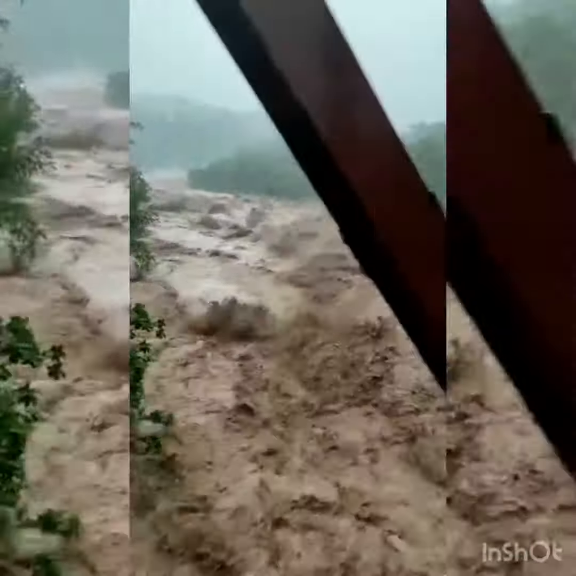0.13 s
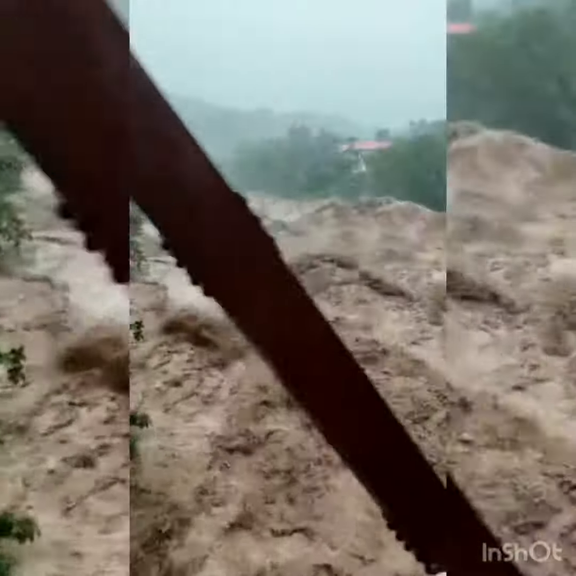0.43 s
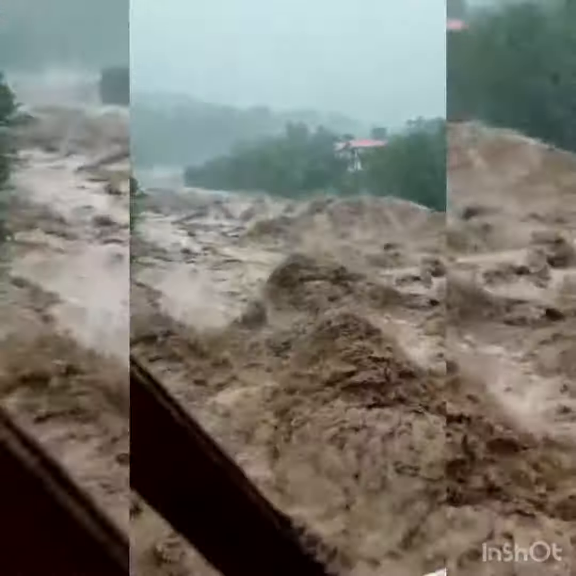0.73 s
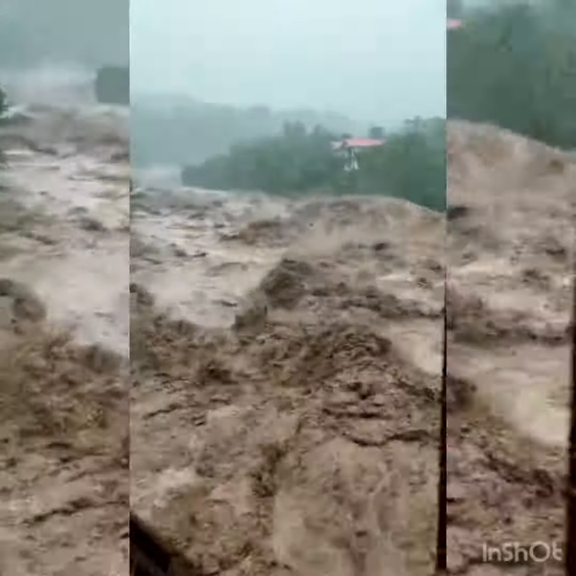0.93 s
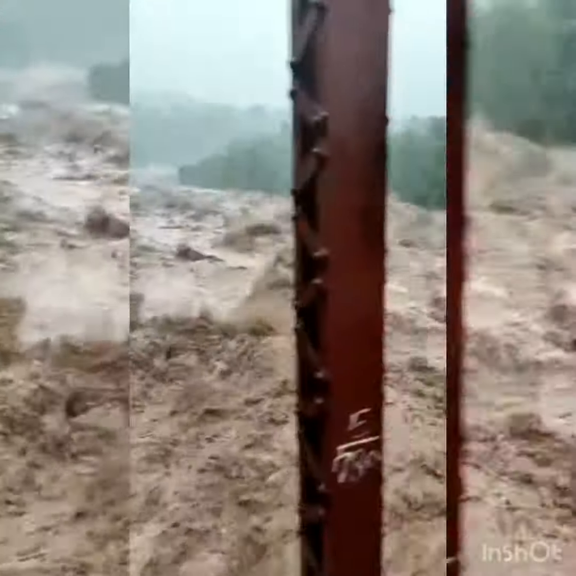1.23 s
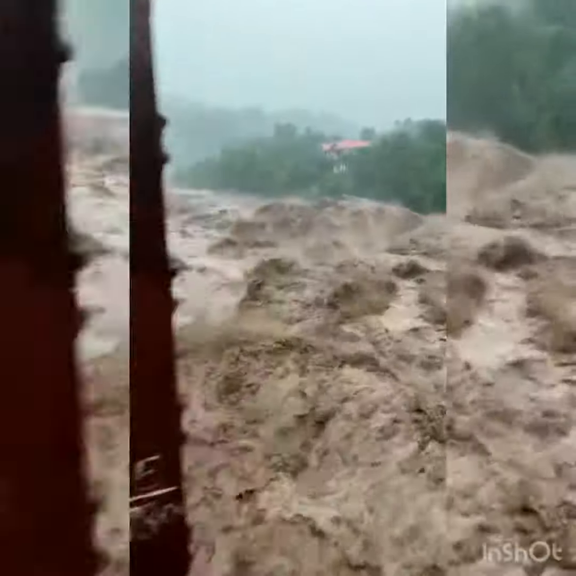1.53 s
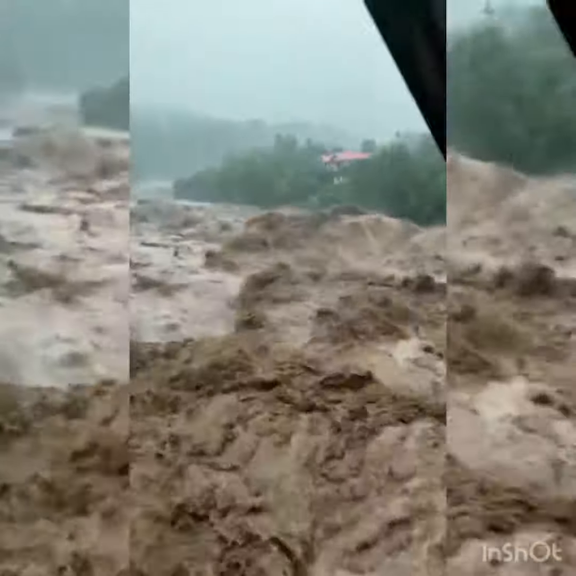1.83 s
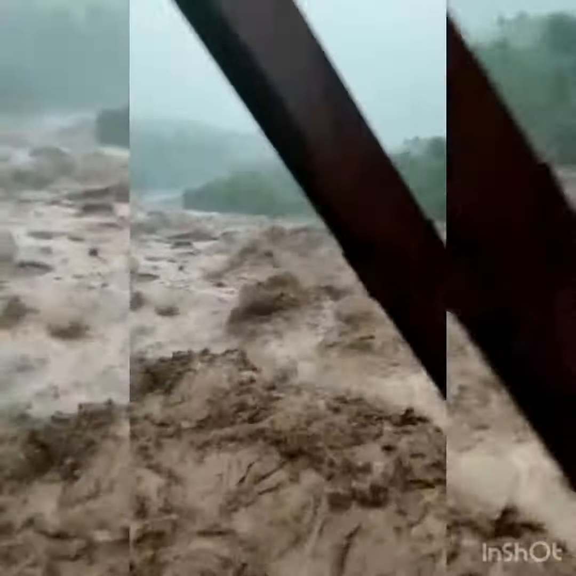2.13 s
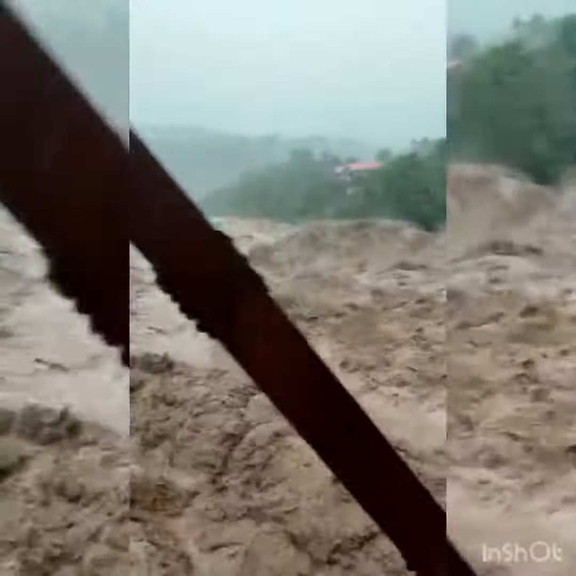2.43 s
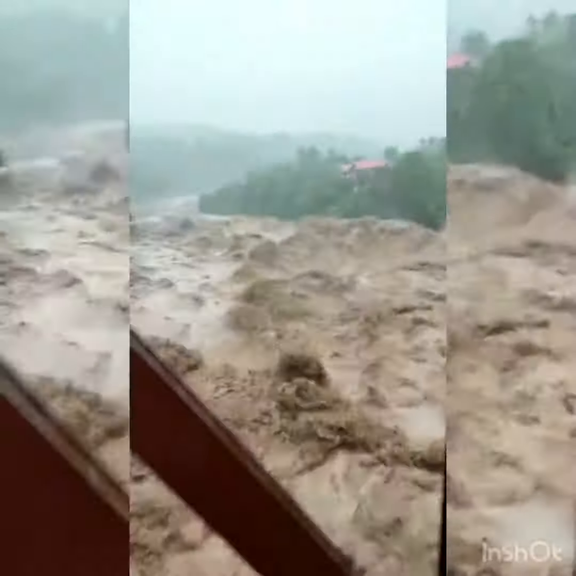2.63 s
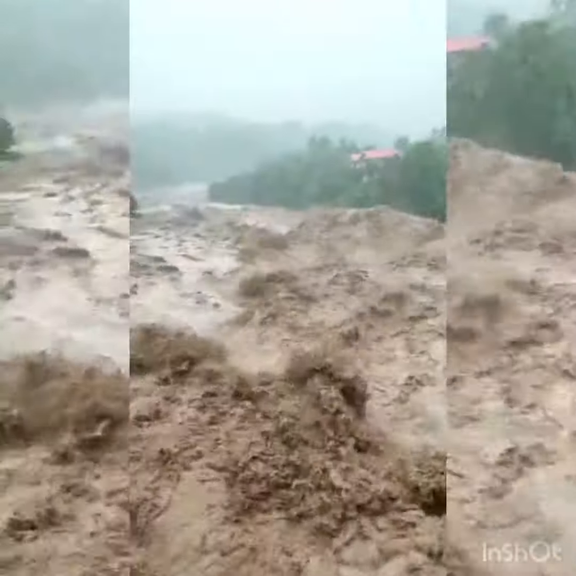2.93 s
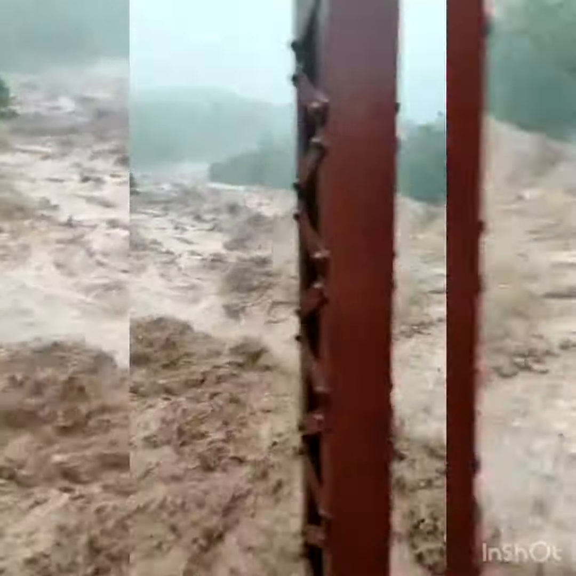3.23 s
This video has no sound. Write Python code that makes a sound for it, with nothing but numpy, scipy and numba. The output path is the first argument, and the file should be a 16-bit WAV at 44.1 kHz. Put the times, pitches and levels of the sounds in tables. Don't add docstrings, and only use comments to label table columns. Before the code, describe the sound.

Raging floodwater roars densely and steadily, with low engine throb and wind thumping the microphone.

```python
import sys
import numpy as np
from scipy import signal
from scipy.fft import rfft, irfft
from scipy.io import wavfile
from scipy.ndimage import uniform_filter1d
from numba import njit

SR = 44100
rng = np.random.default_rng(int(sys.argv[2]) if len(sys.argv) > 2 else 0)


def put_to_file(sound):
    columns = np.atleast_2d(sound).T
    safe = np.clip(columns, -1, 1)
    whole_steps = np.round(safe * 32767)
    wavfile.write(sys.argv[1], SR, whole_steps.astype(np.int16))


def to_linear_factor(level_db):
    exponent = np.asarray(level_db, float) / 20
    return 10 ** exponent


N = 148617
ENGINE_HZ = 20.1


def on_log(hz, table):
    points = np.array(table)
    return np.interp(np.log(hz + 1e-9), np.log(points[:, 0]), points[:, 1])


def unit(x):
    return x / np.sqrt(np.mean(x ** 2))


def walk(rate):
    hold = int(SR / rate)
    steps = np.repeat(rng.standard_normal(N // hold + 1), hold)
    return 1.3 * uniform_filter1d(uniform_filter1d(steps, hold), hold)[:N]


def add(out, start_s, piece):
    i = max(int(start_s * SR), 0)
    out[i:i + len(piece)] += piece[:max(N - i, 0)]


def river():
    # (frequency [Hz], density [dB per Hz])
    water_spectrum = [(12, 8), (35, -2.5), (110, -8.5), (230, -7.5), (600, -15), (900, -14.5),
                      (2600, -21.5), (12000, -34)]
    # (frequency [Hz], difference [dB])
    port_balance = [(60, 0), (250, 3.5), (500, 2.5), (850, 5), (2400, 8), (4400, 1), (7000, -2.5),
                    (12000, 3)]
    # (frequency [Hz], share [0-1])
    port_likeness = [(30, .6), (130, .35), (290, .65), (640, .65), (1400, .05), (3000, .08), (7000, .01)]
    # (time [s], level [dB])
    surge_levels = [
        (0.0, -25),
        (.35, -25.5),
        (0.68, -26.5),
        (1.1, -26.5),
        (1.45, -27),
        (1.8, -25.5),
        (2.2, -26.5),
        (2.59, -26.5),
        (3.04, -25),
        (3.37, -24.5),
    ]
    bubble_db, gain_db = -8, 7.5
    t, f = np.arange(N) / SR, np.fft.rfftfreq(N, 1 / SR)
    surge = np.interp(t, *np.array(surge_levels).T)
    mean_db = surge.mean()

    water = np.array([rng.standard_normal(N) + to_linear_factor(bubble_db) * bubbles() for _ in range(2)])
    alike = np.clip(on_log(f, port_likeness), 0, 1)
    pan = on_log(f, port_balance) / 2
    mid, side = rfft(water) * to_linear_factor(on_log(f, water_spectrum)) * np.sqrt([1 + alike, 1 - alike])
    ports = np.array([(mid + side) * to_linear_factor(pan), (mid - side) * to_linear_factor(-pan)])

    out = 0
    shared_splash = 0.7 * walk(16)
    clatter = 0.98 * np.cos(2 * np.pi * ENGINE_HZ * t)
    for half_octave in range(22):
        hz = 11 * 2 ** (half_octave / 2)
        band = np.cos(np.clip(2 * np.log2((f + 1e-9) / hz), -1, 1) * np.pi / 2) ** 2
        treble = np.clip(np.log2(hz / 300) / 3, 0, 1)
        db = surge - mean_db + treble * shared_splash + 0.84 * walk(12)
        db = db + clatter * (300 < hz < 3000)
        out = out + to_linear_factor(db) * irfft(ports * band, N)
    return unit(out) * to_linear_factor(mean_db + gain_db)


def bubbles():
    bubbles_per_s, spread_db = 5000, 2.2
    when, pitch, rarity, damping = rng.random((int(bubbles_per_s * N / SR), 4)).T
    hz = 150 * 80 ** pitch
    size = to_linear_factor(-spread_db * np.log(1 - .97 * rarity)) * hz / 1000
    cycles = 3.5 + 1.73 * damping
    return unit(rings((when * N).astype(np.int64), hz, cycles, size, .25, N, 1. * SR))


@njit
def rings(start, hz, cycles, size, glide, n, sr):
    out = np.zeros(n + 9000)
    for k in range(len(start)):
        span = min(int(4 * cycles[k] / hz[k] * sr), 8000)
        swing = complex(size[k], 0.)
        turn = np.exp(complex(-hz[k] / cycles[k], 2 * np.pi * hz[k]) / sr)
        rise = np.exp(complex(0., 2 * np.pi * hz[k] * glide / sr / max(span, 1)))
        for i in range(span):
            out[start[k] + i] += swing.imag
            swing, turn = swing * turn, turn * rise
    return out[:n]


def engine():
    # (multiple of the turning rate, level [dB])
    orders = [(1, -26.5), (2, -31.5), (3, -37.5), (4, -31), (5, -36), (7, -43.5), (8, -36), (10, -51),
              (11, -80)]
    # (time [s], level [dB])
    load = [
        (0, 0.5),
        (.6, -1.5),
        (1.0, 1),
        (1.6, -2.5),
        (1.9, 4),
        (2.4, 1),
        (2.7, 3.5),
        (3.37, 1.5),
    ]
    turn = 2 * np.pi * np.cumsum(ENGINE_HZ * (1 + 0.0037 * walk(1.485))) / SR
    tone = np.zeros(N)
    for multiple, db in orders:
        tone += np.sqrt(2) * to_linear_factor(db) * np.sin(multiple * turn + 2 * np.pi * rng.random())
    load_db = np.interp(np.arange(N) / SR, *np.array(load).T)
    return tone * to_linear_factor(load_db + np.array([[.9], [-.9]]))


def rattle():
    # (time [s], level [dB], brightness [dB])
    contacts = [(.9620, -21, 0), (.9640, -9, -9), (.9672, -16, 5), (.9703, -14, 4), (.9740, -18, -1),
                (.9772, -12, -1), (.9808, -19, 0), (1.2118, -22, 2), (1.2138, -12, -4), (1.2160, -15, -2),
                (1.2205, -18, -1), (1.2222, -14, -3), (1.2248, -20, 0), (1.228, -23, 0)]
    # (frequency [Hz], level [dB], t60 [s])
    fitting_modes = [(2720, 6, .012), (3330, 7.5, .007), (4200, -2, .006), (5900, -7, .006),
                     (7060, -9.5, .01), (7600, -12, .008), (10800, -17, .0045), (12800, -17, .006),
                     (15000, -14, .012)]
    scrape_s, second_jolt_s, other_jolt_db = .0005, 1.1, -9
    out, t = np.zeros((2, N)), np.arange(2000) / SR
    for s, db, bright_db in contacts:
        scrape = rng.standard_normal(len(t)) * t * np.exp(-t / scrape_s)
        scrape /= np.sqrt(np.sum(scrape ** 2))
        for port in out:
            add(port, s - scrape_s, np.diff(scrape) * to_linear_factor(db))
        for hz, mode_db, t60 in fitting_modes:
            ring_db = db + mode_db
            if hz > 6000:
                ring_db += bright_db
            elif (s > second_jolt_s) == (hz > 3000):
                ring_db += other_jolt_db
            mode = to_linear_factor(ring_db - 60 * t / t60) * np.sin(2 * np.pi * hz * t)
            ring = signal.fftconvolve(scrape, mode)
            add(out[0], s - scrape_s, ring)
            add(out[1], s - scrape_s, ring * to_linear_factor(-2.5 if hz > 6000 else -10))
    return out


def wind_eddies():
    # (time [s], level [dB], pitch [Hz], length [s])
    right_eddies = [(.346, -21, 250, 0.014), (.582, -12, 365, 0.0072), (.602, -13.5, 262, 0.013),
                    (.622, -15, 240, .004), (.646, -13.5, 226, 0.01), (.680, -14.5, 396, .012),
                    (.692, -11.5, 326, 0.013), (.715, -16.5, 280, 0.0117), (.749, -14, 317, 0.0178),
                    (.791, -15, 306, 0.015), (.808, -23, 330, 0.0066), (.843, -18.5, 278, 0.0091),
                    (.951, -12, 272, 0.01), (1.002, -20, 200, 0.014), (1.165, -17, 310, 0.01),
                    (1.3, -13, 205, 0.017), (1.533, -16, 275, 0.02), (1.571, -9.5, 346, 0.014),
                    (1.685, -16.5, 364, 0.0096), (1.709, -13.5, 314, 0.009), (1.763, -16.5, 221, 0.011),
                    (1.792, -13, 266, 0.0093), (1.843, -15, 298, 0.021), (1.908, -21, 278, 0.0078),
                    (2.122, -14.5, 240, 0.017), (2.23, -24, 370, 0.014), (2.335, -21, 380, 0.016),
                    (2.511, -15, 305, 0.011), (2.72, -20.5, 350, .012), (2.82, -22.5, 370, 0.013),
                    (2.85, -21, 220, 0.0148), (3.0, -18, 240, .015), (3.045, -16, 294, 0.021),
                    (3.117, -17, 313, 0.014)]
    left_eddies = [(.358, -62, 248, 0.0083), (1.128, -16, 348, 0.02), (1.577, -20, 302, 0.0076),
                   (1.788, -19, 280, 0.016), (1.81, -16.5, 980, 0.01), (1.847, -15.5, 555, 0.015),
                   (2.135, -15.5, 202, 0.017), (2.225, -19, 370, 0.0119), (2.51, -23, 300, 0.011),
                   (2.72, -20, 330, 0.0125), (2.868, -21, 302, 0.0048), (3.013, -14, 300, 0.019)]
    left, right, leak = eddy_thumps(left_eddies), eddy_thumps(right_eddies), to_linear_factor(-12.5)
    return np.array([left + leak * right, right + leak * left])


def eddy_thumps(table):
    pitch_spread = .27
    out, t = np.zeros(N), np.arange(-2000, 2000) / SR
    for s, db, hz, length in table:
        at, pitch, turn = rng.standard_normal((3, 7, 1))
        f = hz * np.exp(pitch_spread * pitch)
        late = t - 0.4357 * length * at
        swell = np.exp(-(late * f / 0.52) ** 2)
        puff = (swell * np.cos(2 * np.pi * f * late + 3 * turn)).sum(0)
        add(out, s + t[0], puff * to_linear_factor(db) * np.sqrt(0.013 * SR / np.sum(puff ** 2)))
    return out


def gusts():
    # (middle [s], length [s], level [dB], pitch [Hz])
    gust_list = [
        (0.693, 0.18, -25, 337),
        (1.26, 0.1, -28, 273),
        (1.54, 0.069, -26, 300),
        (1.796, 0.23, -32, 328),
        (2.35, 0.1, -33, 378),
        (2.664, 0.042, -26.5, 210),
        (3.092, 0.28, -30, 348),
    ]
    port_gain = to_linear_factor(np.array([[-6], [0]]))
    t, out = np.arange(N) / SR, 0
    for s, length, db, hz in gust_list:
        sos = signal.butter(2, [hz / 2, hz * 1.41], "band", fs=SR, output="sos")
        rush = np.array([unit(signal.sosfilt(sos, rng.standard_normal(N))) for _ in range(2)])
        swell = np.exp(-((t - s) / length) ** 4)
        out = out + to_linear_factor(db + 4.3 * walk(40.17)) * swell * rush * port_gain
    return out


def scene():
    return river() + engine() + rattle() + wind_eddies() + gusts()


def thin_treble(x):
    # (frequency [Hz], share lost [0-1])
    lost_share = [(900, 0), (1600, .09), (3000, .09), (5000, .27), (7500, .13), (9200, .28), (9600, .55),
                  (11000, .45), (14500, .7), (15700, .92)]
    hop, patch_frames, edge_hz, top_hz = 1024, 2, 15150, 15830
    n, k = np.arange(2 * hop)[:, None] + .5, np.arange(hop) + .5
    window = np.sin(np.pi * n / (2 * hop))
    basis = window * np.cos(np.pi / hop * (n + hop / 2) * k) * np.sqrt(2 / hop)
    count, lead, f = N // hop + 3, 464 + hop, k * SR / (2 * hop)
    halves = np.pad(x, ((0, 0), (lead, (count + 1) * hop - N - lead))).reshape(2, -1, hop)
    z = halves[:, :-1] @ basis[:hop] + halves[:, 1:] @ basis[hop:]

    def patches(bins):
        field = uniform_filter1d(rng.standard_normal(z.shape[1:]), bins, axis=1)
        return unit(uniform_filter1d(field, patch_frames, axis=0))

    field_db = 22 * patches(6) + 20 * patches(26)
    flicker = uniform_filter1d(rng.standard_normal((count, 1)), patch_frames, axis=0) * (f > edge_hz)
    power = np.mean(z ** 2, axis=0) + 1e-18
    band_db = 10 * np.log10(uniform_filter1d(power, size=40, axis=1))
    stands_out = np.maximum(band_db - np.median(band_db, axis=0) - 3, 0)
    score = 10 * np.log10(power) + 10 * stands_out + field_db + 35 * flicker
    rank = score.argsort(axis=0).argsort(axis=0) / count
    lost = on_log(f, lost_share) + 1e-9
    kept = np.clip((rank - lost) / (1.3 * lost * (1 - lost)), 0, 1) ** 2
    z = z * kept * (f < top_hz)

    out = np.zeros_like(halves)
    out[:, :-1] += z @ basis[:hop].T
    out[:, 1:] += z @ basis[hop:].T
    return out.reshape(2, -1)[:, lead:lead + N]


def low_pass(x):
    return signal.sosfilt(signal.butter(12, 15830, fs=SR, output="sos"), x)


def record(dry):
    # (frequency [Hz], width [Hz], rise [dB])
    port_peaks = [(7730, 1060, 18), (7430, 970, 17.5)]
    port_top_hz, top_shelf_db, ceiling = 9940, -6, 2.2
    duck_top_db, duck_ratio, duck_s = -23.5, 1.355, 0.066
    rung = []
    for x, (hz, width, db) in zip(dry, port_peaks):
        peak = signal.lfilter(*signal.iirpeak(hz, hz / width, SR), x)
        rung.append(x + (to_linear_factor(db) - 1) * peak)
    low = signal.sosfilt(signal.butter(5, port_top_hz, fs=SR, output="sos"), rung)
    x = low + to_linear_factor(top_shelf_db) * dry
    loud = np.sqrt(uniform_filter1d(np.mean(x ** 2, axis=0), int(duck_s * SR)))
    x = x * np.minimum(to_linear_factor(duck_top_db) / loud, 1) ** (1 - 1 / duck_ratio)
    mix = thin_treble(np.tanh(x / ceiling) * ceiling)
    return low_pass(mix)


dry = scene()
out = record(dry)
put_to_file(out)
```